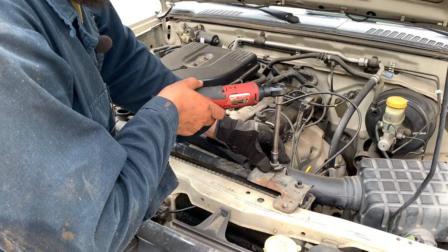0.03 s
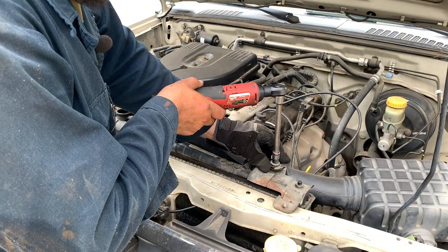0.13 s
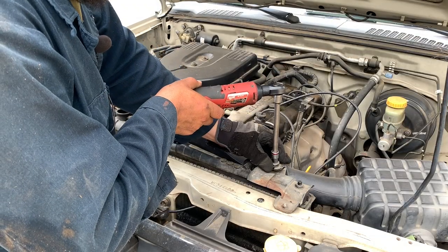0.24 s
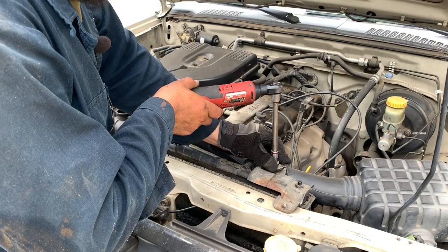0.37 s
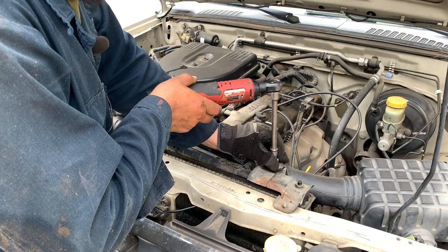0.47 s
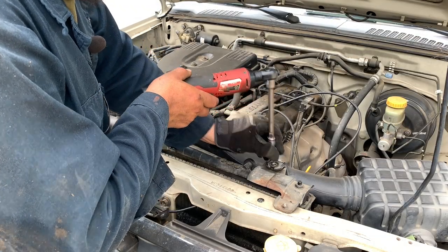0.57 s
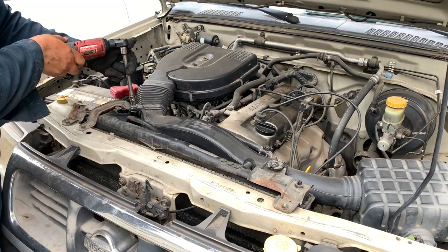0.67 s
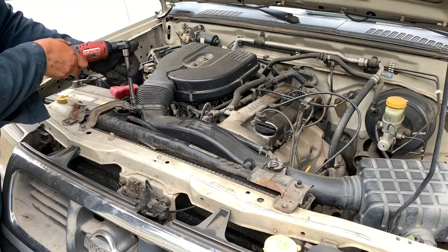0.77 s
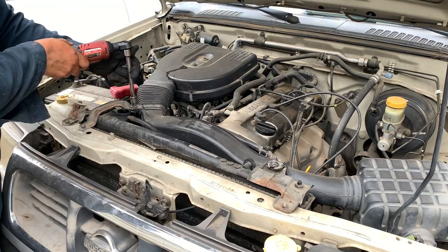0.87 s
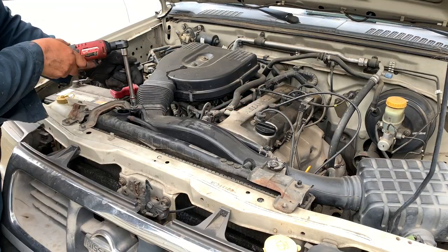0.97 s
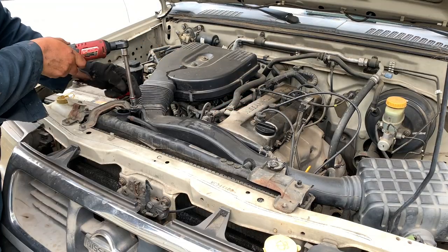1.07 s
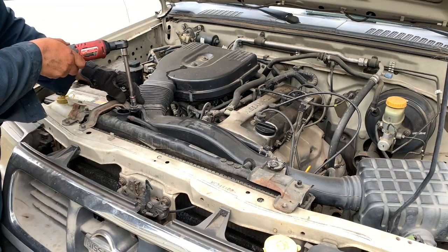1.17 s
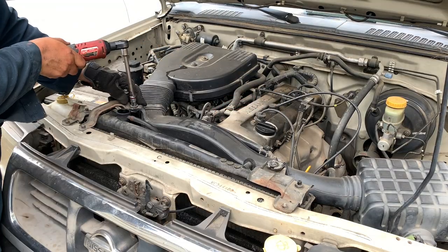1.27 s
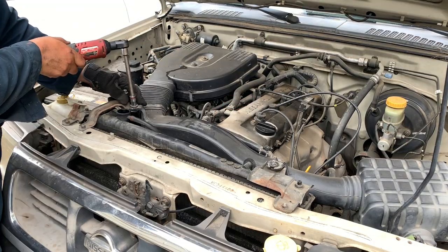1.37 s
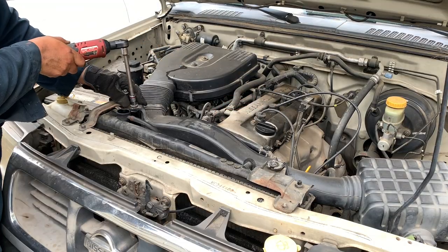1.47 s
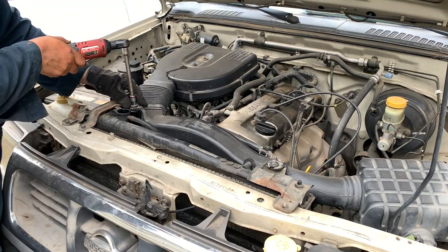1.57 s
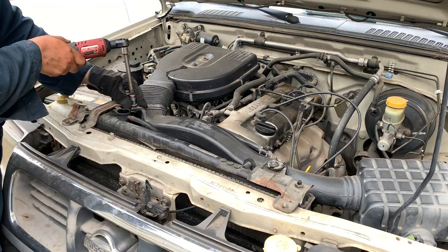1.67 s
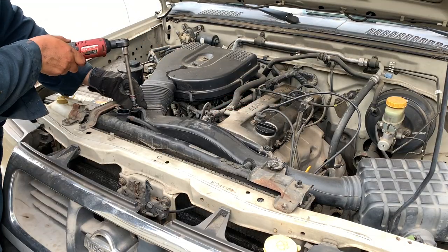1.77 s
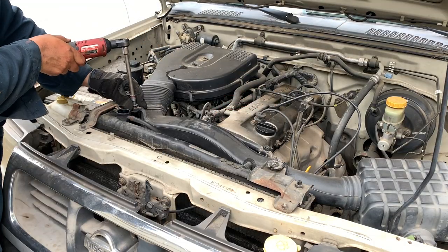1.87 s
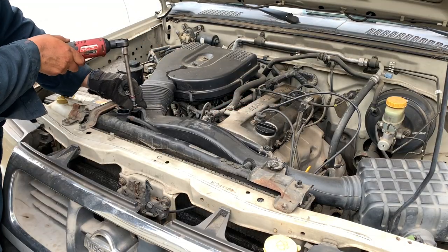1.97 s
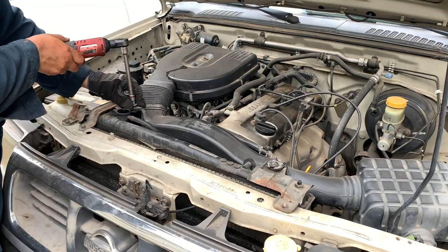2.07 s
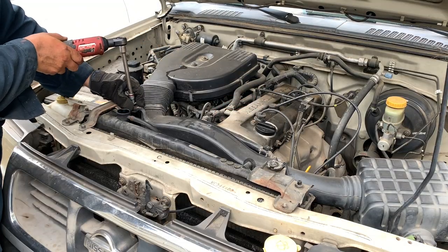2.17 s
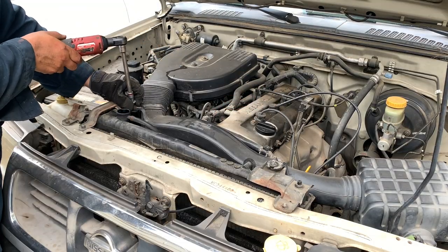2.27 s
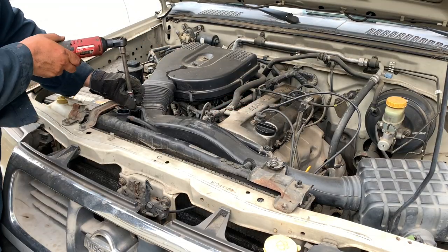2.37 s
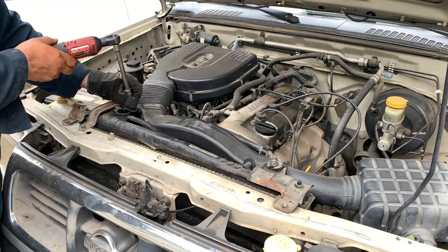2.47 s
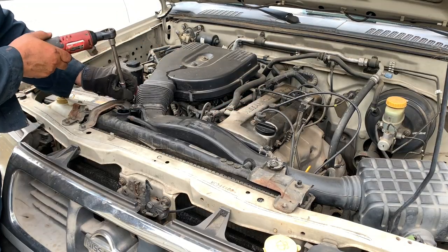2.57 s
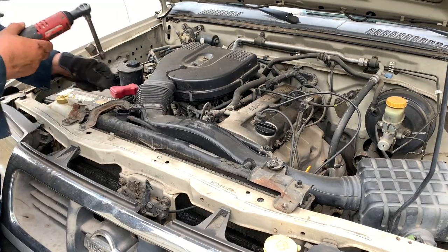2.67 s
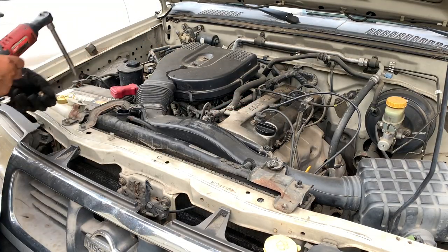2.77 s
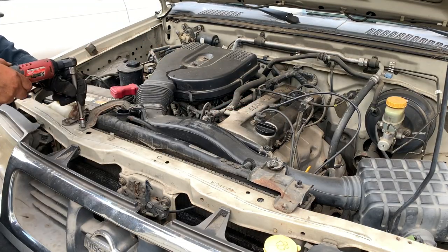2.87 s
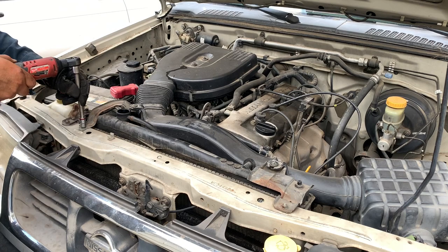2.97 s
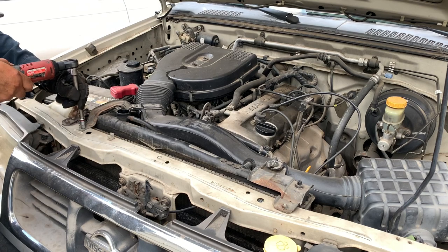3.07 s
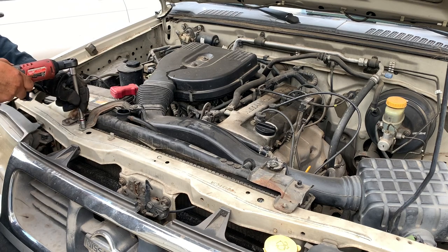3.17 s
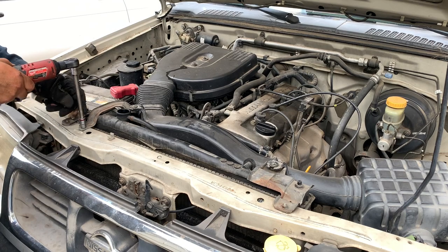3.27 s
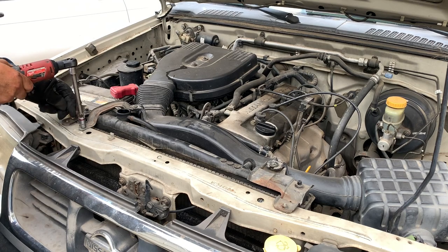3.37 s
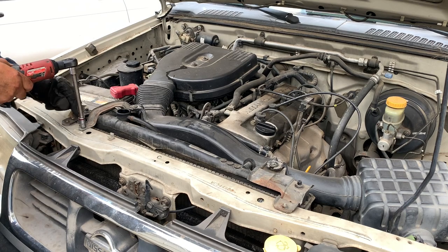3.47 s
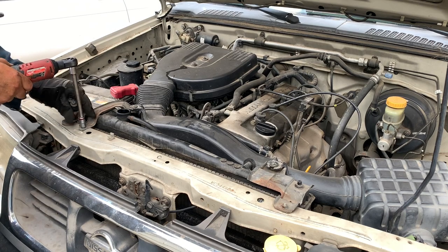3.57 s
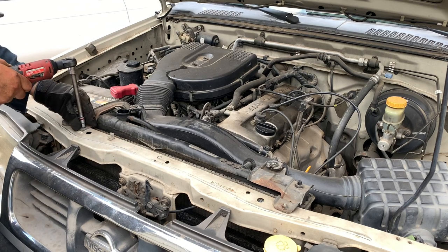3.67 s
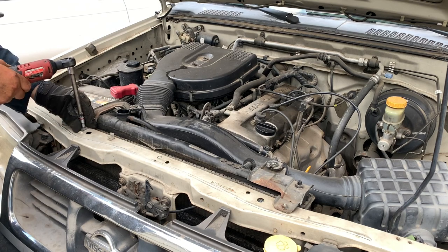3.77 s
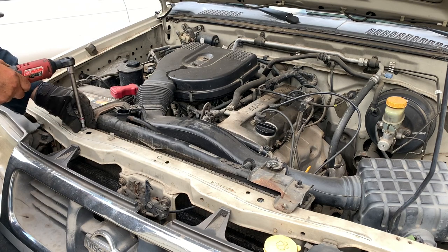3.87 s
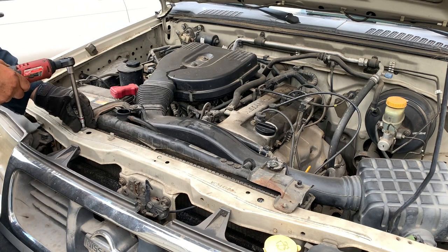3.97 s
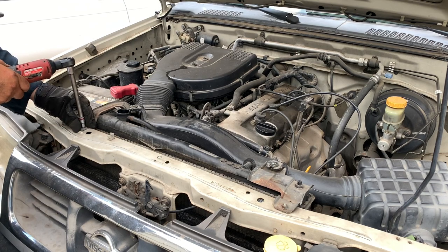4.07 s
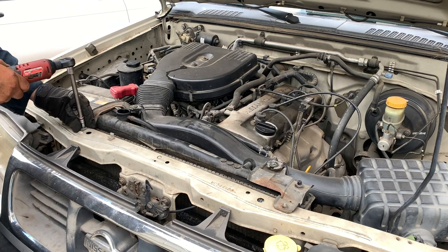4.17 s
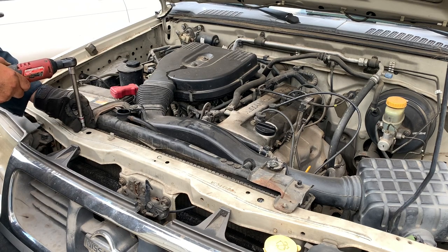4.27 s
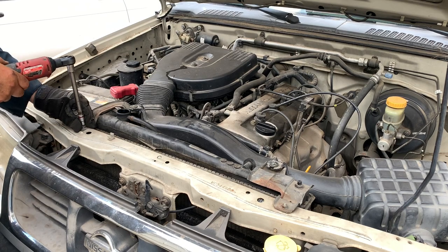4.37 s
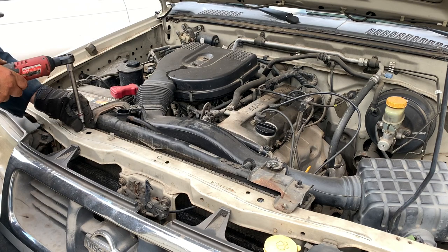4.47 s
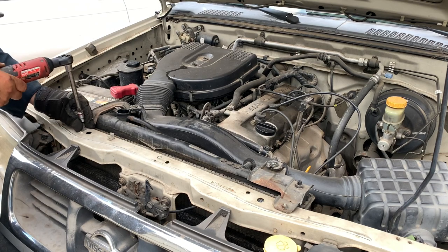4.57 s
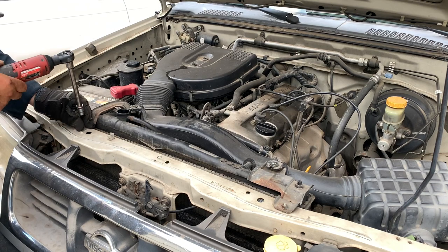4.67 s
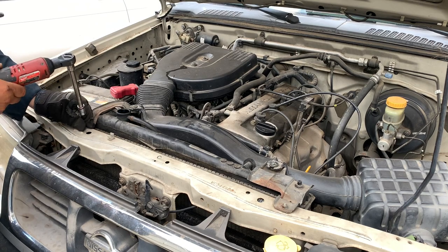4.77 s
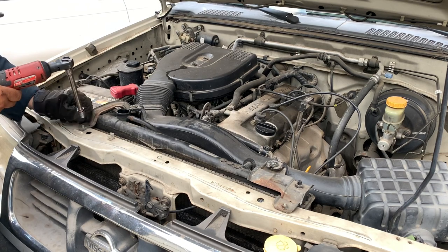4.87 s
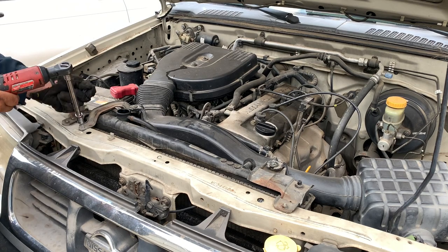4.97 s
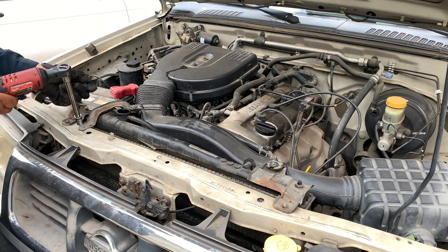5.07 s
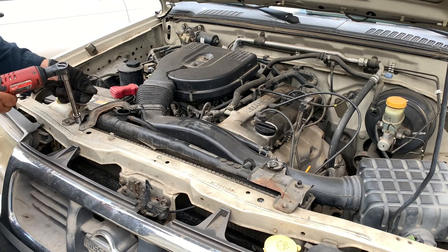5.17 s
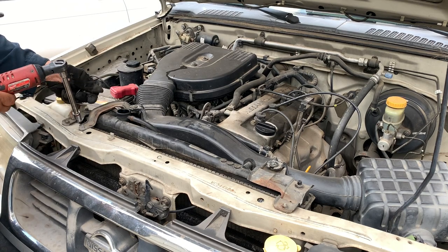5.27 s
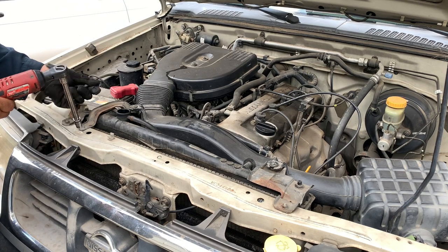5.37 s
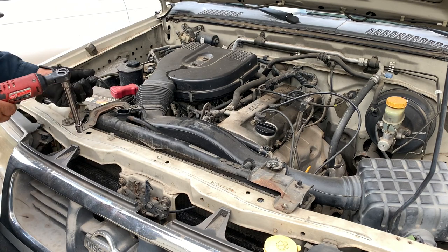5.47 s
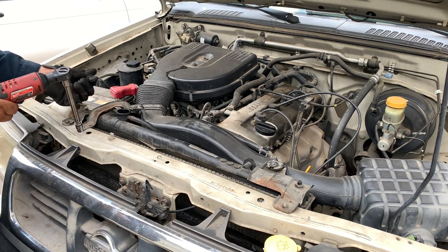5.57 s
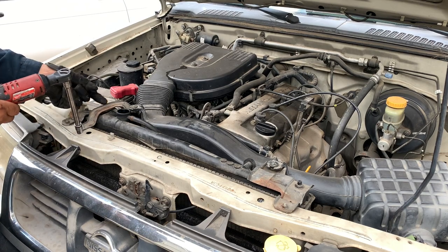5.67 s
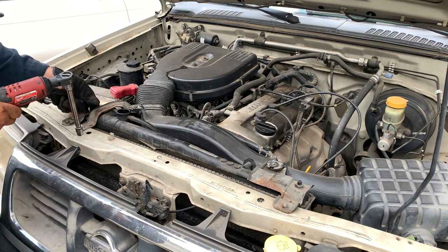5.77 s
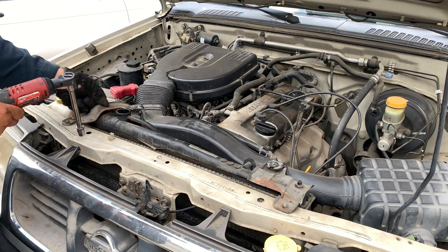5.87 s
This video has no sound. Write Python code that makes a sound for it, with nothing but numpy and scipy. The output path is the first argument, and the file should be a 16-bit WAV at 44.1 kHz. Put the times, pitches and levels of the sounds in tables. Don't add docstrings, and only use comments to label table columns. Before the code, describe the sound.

A cordless ratchet buzzes through three bursts of bolt turning, each coasting down to clicks, with light socket ticks between and after.

```python
import sys
import numpy as np
from scipy import signal
from scipy.fft import rfft, irfft, next_fast_len
from scipy.io import wavfile
from scipy.ndimage import uniform_filter1d, map_coordinates

SR = 44100
rng = np.random.default_rng(int(sys.argv[2]) if len(sys.argv) > 2 else 0)


def dump(signal):
    limited = np.clip(np.atleast_2d(signal).T, -1, 1)
    pcm = np.round(limited * 32767).astype(np.int16)
    wavfile.write(sys.argv[1], SR, pcm)


def undo_db(level):
    steps = np.asarray(level, float) / 20
    return 10 ** steps


N = 261513
T = np.arange(N) / SR

# frequency in Hz, spectral level in dB per Hz.
HEAD_COLOURS = [
    [(880, -27.5), (1500, -8.5), (1810, -1.5), (2210, -7), (2680, -2), (3300, -7.5), (4150, 2.5),
     (5950, -8), (6910, 4), (9230, -2.5), (10500, 4.5), (12000, -3), (14900, 4.5), (15700, 4), (16300, -26)],
    [(880, -37.5), (1500, -11.5), (1960, -3), (2170, -1.5), (2550, -4), (2810, -2), (3170, -7), (4240, 2),
     (5550, -4), (8350, 3), (10100, -2), (12100, 2.5), (15200, 0.5), (15800, 4.5), (16300, -38)],
    [(880, -37), (1500, -12.5), (1930, -3), (2060, -11), (2190, -1), (2760, -8), (3200, 0), (3470, -4),
     (4030, 1), (5770, -5.5), (8100, 2), (9140, -4.5), (12300, 0.5), (15400, -5.5), (16300, -10.5)],
]
# start, release and stop in seconds, full speed in strokes per second,
# coasting loss in strokes per second each second.
PULLS = [
    (-1, .44, .677, 152, 390),
    (.826, 2.115, 2.46, 151.5, 335),
    (3.0325, 4.38, 4.77, 150.7, 300),
]
# bite of the pawl in seconds, head level in dB, fade while coasting in dB per
# second, hum relative to the head in dB.
BITES = [
    (-.5, -28, 37.5, -6.5),
    (0.852, -29, 55, -5),
    (3.037, -29.5, 54.5, -2.5),
]
# time in seconds, fade out and fade in in seconds, dip in dB.
SCENE_CHANGES = [
    (0.679, 0.005, 0.028, -27),
    (2.848, 0.034, 0.01, -21.5),
]
CRAWL = 30


def unit(x):
    return x / np.sqrt(np.mean(x ** 2) + 1e-20)


def noise():
    return rng.standard_normal(N)


def along(points, hz):
    f, v = np.transpose(points)
    return np.interp(np.log(hz + 1), np.log(f + 1), v)


def curve(rows):
    return np.interp(T, *np.transpose(rows))


def wobble(rate):
    coarse = T[::32]
    knots = rng.standard_normal(int(N * rate / SR) + 4)
    return np.interp(T, coarse, map_coordinates(knots, [coarse * rate]))


def coloured(x, spectrum):
    m = next_fast_len(N + 8192, True)
    gain = undo_db(along(spectrum, np.fft.rfftfreq(m, 1 / SR)))
    cepstrum = irfft(np.log(gain + 1e-5), m)
    cepstrum[1:m // 2] *= 2
    cepstrum[m // 2 + 1:] = 0
    return irfft(rfft(x, m) * np.exp(rfft(cepstrum)), m)[:N]


def decaying(spikes, t60, rise):
    lag = np.exp(-1 / (rise * SR))
    fall = signal.lfilter([1], [1, -undo_db(-60 / (t60 * SR))], spikes)
    return signal.lfilter([1 - lag], [1, -lag], fall)


def swells(rows, floor_db):
    levels = [db - 30 * np.maximum((s - T) / rise, (T - s) / fall) for s, db, rise, fall in rows]
    return np.max(levels + [np.full(N, floor_db)], axis=0)


def garage():
    # time in seconds, drone level in dB.
    drone_db = [(.75, -59.5), (2.49, -58.5), (3, -58.5), (4.85, -61), (5.03, -64.5), (5.56, -63),
                (5.93, -60.5)]
    # frequency in Hz, spectral level in dB per Hz.
    drone_colour = [(53, -46), (90, -8.5), (199, -8.5), (263, -6.5), (337, -9), (374, -6), (465, -12.5),
                    (662, -10), (692, -14.5), (1280, -19), (1420, -20), (1880, -21), (3000, -40),
                    (3900, -68), (6600, -120)]
    hiss_colour = [(1200, -29), (2000, -6), (3000, -2), (5000, -6), (6200, -11.5), (8200, -6.5),
                   (10200, -12.5), (12000, -10), (16000, -8.5)]
    drift, flicker = undo_db(1.2 * wobble(9)), undo_db(1.2 * wobble(14))
    drone = undo_db(curve(drone_db) - 3.5) * drift * unit(coloured(noise(), drone_colour))
    hiss = undo_db(-75.7) * flicker * unit(coloured(noise(), hiss_colour))
    return drone + hiss + undo_db(-94) * np.sin(2 * np.pi * 12021 * T)


def crank():
    missing, spin_up_s = 42, .075
    speed = np.zeros(N)
    for start, release, _, full, loss in PULLS:
        spin_up = full - missing * np.exp(-np.abs(T - start) / spin_up_s)
        run = spin_up - loss * np.maximum(T - release, 0)
        speed = np.where(T >= start, np.maximum(run, CRAWL), speed)
    return speed


def loudness(release, speed, bite, db, fade_db):
    rise_db_per_s, slack_db, slack_s = 1501, -3, .059
    hush_db = -4.5
    stall_db, stall_rate = -12, 12
    since = T - bite
    start_db = np.where(since < 0, rise_db_per_s * since, slack_db * np.exp(-np.abs(since) / slack_s))
    coast_db = -fade_db * np.maximum(T - release, 0)
    slow_db = hush_db * np.clip((104 - speed) / 30, 0, 1)
    return db + start_db + coast_db + slow_db + stall_db * np.exp(-(speed - CRAWL) / stall_rate)


def pawl(turns, scatter_db):
    # share of the turn, level in dB.
    contacts = [
        (0, 11),
        (.34, -10),
        (.67, -9),
    ]
    spikes = np.zeros(N)
    whole = np.arange(int(turns[-1]))
    for share, db in contacts:
        luck = rng.standard_normal((len(whole), 2))
        at = np.interp(whole + share + .02 * luck[:, 0], turns, np.arange(N))
        spikes[at.astype(int)] += undo_db(db + scatter_db * luck[:, 1])
    return spikes


def crank_hum(turns, orders):
    total = np.zeros(N)
    for k, db in orders[1:]:
        phase = 2 * np.pi * k * turns + .42 * wobble(40) + 6 * rng.random()
        total += undo_db(db + 3.6 * wobble(32)) * np.sin(phase)
    return unit(total)


def rocking(turns):
    start, stop, bound_db, else_db = 3.8, 4.28, -56, -71
    bound = np.clip(np.minimum(T - start, stop - T) / .07 + .5, 0, 1)
    level_db = else_db + (bound_db - else_db) * bound + 3 + 4.2 * wobble(18)
    return undo_db(level_db) * np.sin(2 * np.pi * turns + 1.7 * wobble(20))


def ratchet():
    # multiple of the crank
    # rate, level in dB.
    orders = [
        [(1, -4), (2, -19), (3, 5), (4, 6), (5, 6.5), (6, -2.5), (7, 4.5), (8, -2), (9, -12), (10, -3), (11, 2)],
        [(1, -40), (2, -6.5), (3, -3), (4, -2.5), (5, 3), (6, 3), (7, 4.5), (8, 2.5), (9, -2), (10, -6.5),
         (11, 3.5)],
        [(1, -9.5), (2, -20.5), (3, -12), (4, -10.5), (5, -3), (6, 2.5), (7, -13), (8, -6.5), (9, -17.5),
         (10, -6), (11, -17)],
    ]
    # time in seconds, case noise relative to the head in dB.
    loads = [
        [(0, -12), (.1, -14.5), (.55, -17.5), (.67, -19)],
        [(.851, -3), (.95, -12), (1.55, -15.5), (1.62, -17), (1.8, -15.5), (2.11, -22.5), (2.26, -12.5),
         (2.45, -11)],
        [(3.039, -10.5), (3.067, 4), (3.117, -5.5), (3.15, -10.5), (3.65, -9.5), (4.2, -17.5), (4.32, -15.5),
         (4.39, -23), (4.75, -25)],
    ]
    # frequency in Hz, spectral level in dB per Hz.
    case_colour = [(200, -45), (330, -21.5), (440, -8.5), (680, -4.5), (900, 0.5), (1440, -5), (2200, -4.5),
                   (3500, -10), (7000, -44)]
    head_starts = (.5, .17, 1.14)
    hum_follows = .61
    sag_db_per_s = 5.5
    free_s, free_db = 4.17, -7.5

    speed = crank()
    effort = speed / speed.max()
    turns = np.cumsum(speed) / SR
    turns = turns + sum(ahead * (T >= pull[0]) for ahead, pull in zip(head_starts, PULLS))
    contacts = pawl(turns, scatter_db=2.5) * np.clip((speed - 88) / 25, 0, 1)
    ring = unit(decaying(contacts, t60=.02, rise=.00037))
    snap = unit(decaying(contacts, t60=.0052, rise=.00005))
    clicks = .47 * ring + .3 * snap
    gears = 1.3 * effort ** 2.2 * undo_db(1.1 * wobble(12) + .94 * wobble(45))
    steady = 1 / np.sqrt(uniform_filter1d((gears + clicks) ** 2, size=SR // 12))
    head = steady * (gears + clicks) * noise()
    case = unit(coloured(steady * (gears + .11 * clicks) * noise(), case_colour))
    uneven = turns + .026 * wobble(13) + .011 * wobble(45)

    out = bar(steady * (gears + .4 * clicks) * noise())
    freed_db = free_db * np.clip((T - free_s) / .05, 0, 1)
    for pull, heard, load, colour, multiples in zip(PULLS, BITES, loads, HEAD_COLOURS, orders):
        start, release, stop, *_ = pull
        bite, db, fade_db, hum_db = heard
        case_db = curve(load)
        level = undo_db(loudness(release, speed, bite, db, fade_db))
        on = np.clip(np.minimum(T - start, stop - T) / .0053, 0, 1)
        hum_level = undo_db(hum_db + hum_follows * case_db - sag_db_per_s * (T - bite) + freed_db)
        hum = hum_level * effort ** 5 * crank_hum(uneven, multiples)
        body = unit(coloured(head, colour)) + undo_db(case_db) * case + hum
        out = out + on * (level * body + rocking(turns))
    return out


def filtered_bursts(spikes, t60, rise, colour):
    burst = decaying(spikes, t60, rise) * noise()
    return coloured(burst, colour) / np.std(coloured(noise(), colour))


def jolts():
    # time in seconds, peak level in dB.
    snaps = [(0.0367, -11), (0.0838, -12), (0.0896, -10.5), (0.0962, -12), (0.1555, -10), (0.2606, -9),
             (0.3596, -11), (0.3854, -10), (0.399, -12), (0.4186, -11.5), (0.4669, -13), (0.4816, -12.5),
             (0.4894, -14), (0.523, -15), (0.9549, -13.5), (0.9759, -12), (0.9962, -13), (1.1157, -12),
             (1.3537, -13), (1.3602, -13), (1.466, -11.5), (1.4923, -12.5), (1.4986, -11.5), (1.6304, -12),
             (1.7491, -12.5), (1.8219, -11.5), (1.8423, -12), (1.8547, -13), (1.8813, -12), (2.001, -11.5),
             (2.06, -8), (2.106, -12), (2.1134, -14), (2.127, -13), (2.1414, -13.5), (2.1799, -15),
             (2.1971, -17), (2.2156, -14), (2.225, -12), (2.236, -11), (3.1407, -13), (3.1753, -13),
             (3.1823, -12.5), (3.7901, -12.5), (3.8165, -13), (3.8435, -13), (3.8564, -11), (3.885, -12),
             (4.0752, -12), (4.1018, -14), (4.2082, -12), (4.3736, -15), (4.3937, -13.5), (4.4386, -15),
             (4.4637, -18), (4.4729, -17), (4.4821, -19), (4.5127, -17)]
    slow_clicks = [(0.5573, -20), (0.577, -19), (0.597, -21), (0.6082, -20), (0.619, -18.5), (0.6307, -19),
                   (0.6427, -24), (0.6548, -24.5), (2.2975, -23), (2.3038, -28), (2.312, -22),
                   (2.3199, -33), (2.3291, -22), (2.3383, -29), (2.3482, -26.5), (2.3635, -28),
                   (2.3715, -25), (2.384, -35), (2.3909, -26), (2.4003, -26.5), (2.4193, -40),
                   (2.4247, -36), (2.4291, -31), (2.4352, -29), (2.4497, -26.5), (4.5455, -19.5),
                   (4.5537, -28), (4.561, -21), (4.568, -30), (4.5762, -27), (4.5839, -27), (4.592, -25),
                   (4.6027, -27), (4.6094, -28), (4.618, -31), (4.6236, -30), (4.6285, -28), (4.6443, -31),
                   (4.65, -21.5), (4.668, -30), (4.6753, -22), (4.6879, -35), (4.6938, -32), (4.6987, -31),
                   (4.7063, -26), (4.724, -37), (4.732, -32), (4.74, -31), (4.7524, -31.5), (4.7634, -47),
                   (2.2465, -23), (2.2582, -21), (2.2635, -26), (2.2703, -22), (2.2815, -24), (2.2895, -25)]
    # time in seconds, peak level in dB, low clank in dB.
    take_up = [(0.8484, -7.5, -14), (0.8603, -12.5, -5), (0.8729, -17, -12.5), (0.921, -20, -18),
               (3.036, -13, -17), (3.048, -11, -6), (3.0624, -18, -12.5), (3.0794, -15, -1),
               (3.092, -18.5, 3.5), (3.108, -19, -7), (3.1402, -19.5, -14.5)]
    # frequency in Hz, spectral level in dB per Hz.
    low_colour = [(1300, -41), (1750, -4), (2300, -1), (3200, -4.5), (4300, 1), (5200, -5.5), (5900, -19.5),
                  (8000, -39.5)]
    high_colour = [(4500, -40), (5900, -13.5), (7000, -1), (8200, 2), (9500, -4.5), (12000, 0), (15500, 1),
                   (16300, -30)]
    clank_colour = [(200, -20.5), (400, -10.5), (800, -6.5), (1200, -8), (2400, -14), (3500, -11),
                    (5000, -12), (8000, -35)]
    clank_db = -23.5
    slow_t60 = .014

    crack, low, high, clank = np.zeros((4, N))
    for s, db, low_db in take_up + [(s, db - 3.5, clank_db) for s, db in snaps]:
        at = round(s * SR)
        crack[at] = undo_db(db - 7.5)
        clank[at] = undo_db(db + low_db - 11)
    for s, db in slow_clicks:
        at = round(s * SR)
        tilt_db = 2.2 * rng.standard_normal()
        low[at] = undo_db(db - 15 + tilt_db)
        high[at] = undo_db(db - 9.5 - .33 * tilt_db)
        clank[at] = undo_db(db + clank_db - 12.5)
    slow = filtered_bursts(low, 1.44 * slow_t60, .00058, low_colour)
    slow = slow + filtered_bursts(high, slow_t60, .00024, high_colour)
    bright = unit(coloured(noise(), HEAD_COLOURS[1]))
    dull = unit(coloured(noise(), clank_colour))
    return slow + decaying(crack, .0066, .0002) * bright + decaying(clank, .082, .001) * dull


def dulled(x):
    slow = np.clip(.7 * (1 - crank() / PULLS[-1][3]), 0, 1)
    return x + slow * (uniform_filter1d(x, size=3) - x)


def bay(x, t60):
    t = T[:SR // 4]
    tail = undo_db(-60 * t / t60) * rng.standard_normal(len(t)) * (t > .002)
    return signal.fftconvolve(x, tail / np.linalg.norm(tail))[:N]


def puffs():
    # time in seconds, peak level in dB, rise and fall in seconds.
    gusts = [(.26, -37.5, 0.117, 0.07), (.35, -33, .07, .07), (.47, -51, 0.22, 0.43),
             (.66, -48.5, 0.08, 0.12), (.89, -51.5, 0.183, .2), (1.115, -32, 0.057, 0.27),
             (1.25, -43.5, .2, .15), (2.0, -44.5, 0.216, 0.366), (2.76, -54.5, 0.363, .25),
             (3.0, -55, 0.2, 0.35), (3.06, -38, 0.04, 0.2), (3.3, -55.5, .2, .15), (3.46, -47.5, 0.091, .3),
             (3.56, -34, .2, 0.242), (3.93, -48.5, 0.31, 0.65), (4.5, -28, 0.051, 0.23),
             (4.55, -27, 0.116, 0.17), (5.57, -52, .15, 0.442)]
    # frequency in Hz, spectral level in dB per Hz.
    puff_colour = [(8.8, -36.5), (15, -2), (43, 5), (70, 2.5), (151, -12.5), (239, -28), (269, -39),
                   (350, -32.5), (460, -63), (770, -120)]
    swings = undo_db(3.7 * wobble(25)) * coloured(noise(), puff_colour)
    held = swings / np.sqrt(np.abs(uniform_filter1d(swings ** 2, size=SR // 12)) + 1e-12)
    return undo_db(swells(gusts, floor_db=-71)) * held


def socket():
    # time in seconds, peak, knock and sizzle levels in dB, ring in Hz.
    ticks = [(0.7276, -38, -7, 2, 4520), (2.5656, -53.5, -8, -18, 2230), (2.6903, -54.5, -8, -16.5, 3300),
             (2.7307, -58.5, -11, -20, 2420), (2.796, -45, -28, 0, 7500), (2.86, -44, -17.5, -14, 3600),
             (2.867, -36.5, -11.5, -5, 3070), (2.873, -43, -6.5, -9, 3527), (2.9786, -51, -19, -1, 4360),
             (3.0038, -62, -11, -0.5, 3670), (4.8135, -46, -21, -9, 3198), (4.828, -57, -15.5, -15, 3200),
             (5.102, -57, -16, -2.5, 4560), (5.1507, -64, -7, 1.5, 4580), (5.3669, -61, -13, -14, 4157),
             (5.704, -49, -5.5, -18, 2670), (5.7184, -53, -5, -6.5, 3420), (5.8043, -51.5, -6, -12, 2650),
             (5.8572, -53.5, -6, -19, 4500), (5.871, -42, -9.5, -16, 3350), (5.8777, -37, -12, -9, 3380),
             (5.905, -44, 3, -13, 2520)]
    # time in seconds, peak level in dB.
    touches = [(.716, -59), (.7723, -52), (.7798, -52), (0.7912, -51), (2.9873, -64), (3.02, -52),
               (3.027, -47), (4.92, -67), (5.112, -69), (5.419, -72), (5.5994, -70.5), (5.6227, -68),
               (5.819, -63), (5.829, -62), (5.864, -58)]
    # knock and sizzle in dB, ring in Hz.
    touch_tone = (-4.5, 1.6, 3900)
    # frequency in Hz, spectral level in dB per Hz.
    knock_colour = [(300, -30.5), (800, 4), (1000, -2), (1200, 0), (1500, -8), (1850, -1.5), (2600, -9.5),
                    (4000, -45)]
    body_colour = [(1000, -32.5), (2200, -3.5), (4000, 0), (6500, -1), (9000, -10)]
    sizzle_colour = [(4000, -21.5), (7500, 2), (11000, 3), (16000, -1.5)]
    tick_t60, touch_t60, sizzle_t60 = .03, .018, .03

    knock, body, sizzle = np.zeros((3, N + SR))
    t = T[:SR // 5]
    contacts = [(*row, tick_t60) for row in ticks] + [(*row, *touch_tone, touch_t60) for row in touches]
    for s, db, knock_db, sizzle_db, hz, t60 in contacts:
        shape = undo_db(db - 60 * t / t60) * (1 - np.exp(-t / .0009))
        rough = uniform_filter1d(rng.standard_normal((2, len(t))), size=40, axis=1) * 4.06
        ring = rough[0] * np.sin(2 * np.pi * hz * t) + rough[1] * np.cos(2 * np.pi * hz * t)
        low, mid, high = rng.standard_normal((3, len(t)))
        at = slice(round(s * SR), round(s * SR) + len(t))
        knock[at] += undo_db(knock_db - 4 + .2 * db) * shape ** .7 * low
        body[at] += shape * (undo_db(-.5) * ring + undo_db(-4) * mid)
        sizzle[at] += undo_db(sizzle_db + 1.5 - 60 * t / sizzle_t60) * shape * high
    bright = coloured(body[:N], body_colour) + coloured(sizzle[:N], sizzle_colour)
    return undo_db(12) * coloured(knock[:N], knock_colour) + bright


def pings():
    # time in seconds, level in
    # dB, frequency in Hz, decay of 60 dB in seconds.
    clear_rings = [(0.727, -44.5, 9700, 0.042), (0.727, -42, 1189, 0.061), (.728, -50.5, 4550, .04),
                   (.728, -49.5, 2220, .05), (.851, -27.5, 2350, .06), (.873, -26.5, 2300, 0.126),
                   (0.919, -33.5, 820, 0.14), (2.868, -50, 3520, .045), (2.866, -55, 1710, .04),
                   (2.87, -55, 850, .04), (2.863, -49.5, 5000, 0.047), (5.151, -72, 12000, .025),
                   (5.151, -72, 13900, .03), (5.151, -70, 15000, .03), (5.151, -74, 10000, .03),
                   (5.6, -74, 15200, .03), (5.878, -54, 12240, .025), (5.878, -60, 8086, .035),
                   (5.877, -49, 3920, .05), (5.722, -68, 3370, .15), (5.858, -72, 11370, .15),
                   (5.878, -51, 11300, 0.06), (5.878, -50, 3340, 0.076), (5.906, -43, 1820, 0.0305),
                   (.859, -31, 848, .05), (.874, -30, 1150, .03), (0.88, -31, 2307, 0.063),
                  (3.049, -32, 3150, .03), (3.052, -29, 1700, .03), (3.064, -31.5, 1000, .05),
                  (3.074, -27, 950, .05), (3.082, -27.5, 900, .05), (3.096, -28, 860, .06),
                  (3.06, -28, 4250, .03), (3.079, -29, 3900, .03), (3.087, -29, 4700, .03),
                  (.849, -27, 4950, .025), (.881, -31, 5100, .025), (3.099, -30, 3200, .03),
                  (3.105, -28, 940, .06), (3.132, -35, 800, .08), (3.143, -32.5, 840, .08)]
    out = np.zeros(N)
    for s, db, hz, t60 in clear_rings:
        level_db = db - 60 * np.abs(T - s) / t60 + 2.5 * wobble(150)
        out += (T > s) * undo_db(level_db) * np.sin(2 * np.pi * hz * T)
    return out


def trigger():
    # start and end in seconds, level in dB.
    whines = [
        (.816, .834, -65),
        (3.013, 3.027, -64),
    ]
    on = sum(undo_db(db) * np.clip(np.minimum(T - a, b - T) / .004, 0, 1) for a, b, db in whines)
    multiples_db = (-5.5, 2.5, -1, -9)
    return on * sum(undo_db(db) * np.sin(2 * np.pi * 3720 * k * T) for k, db in enumerate(multiples_db, 1))


def bar(shake):
    # frequency in Hz, bandwidth in Hz, level in dB.
    modes = [(880, 120, -5), (2260, 80, -9), (3150, 150, -2), (4200, 220, -3), (4900, 790, -2),
             (6060, 120, -0.5), (7140, 450, -5)]
    # time in seconds, peak level in dB, rise and fall in seconds.
    binds = [
        (3.25, -35.5, .25, 1),
        (3.49, -34, 0.22, 0.15),
        (3.61, -34, 0.099, 0.52),
        (3.9, -43, .3, .3),
    ]
    rings = np.zeros(N)
    for hz, width, db in modes:
        mode = unit(signal.lfilter(*signal.iirpeak(hz, hz / width, SR), shake))
        rings += undo_db(db + 4.8 * wobble(25)) * mode
    on = (T > BITES[-1][0]) * (T < PULLS[-1][1])
    return on * undo_db(swells(binds, floor_db=-120) + 3.5) * unit(rings)


def scene():
    tool = dulled(ratchet() + jolts()) + socket() + pings() + trigger()
    first = T < SCENE_CHANGES[0][0]
    echo = first * bay(tool, t60=.13) + bay(tool * ~first, t60=.13)
    return (tool + undo_db(-14) * echo + puffs() + garage())[None]


def low_pass(x):
    return signal.sosfilt(signal.butter(12, 17070, fs=SR, output="sos"), x)


def record(dry):
    for s, fade_out, fade_in, db in SCENE_CHANGES:
        dip = np.where(T < s, 1 - (s - T) / fade_out, 1 - (T - s) / fade_in)
        dry = dry * undo_db(db * np.clip(dip, 0, 1) ** 1.3)
    limit = [(15900, 0), (16150, -30), (16600, -55), (17500, -70)]  # Hz, dB
    return low_pass(coloured(dry[0], limit)[None])


dry = scene()
out = record(dry)
dump(out)
```